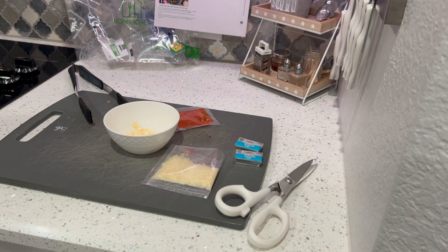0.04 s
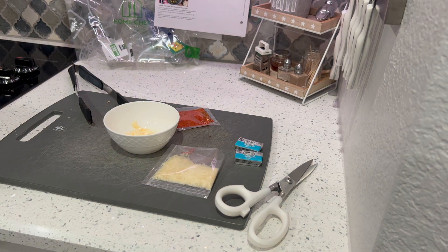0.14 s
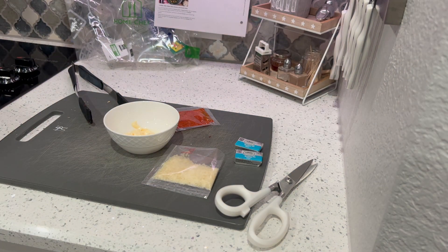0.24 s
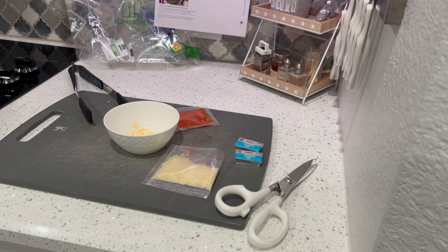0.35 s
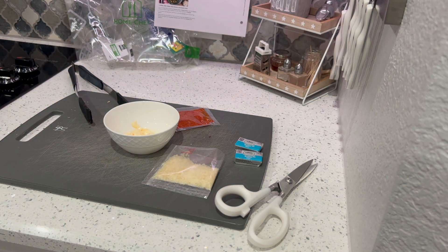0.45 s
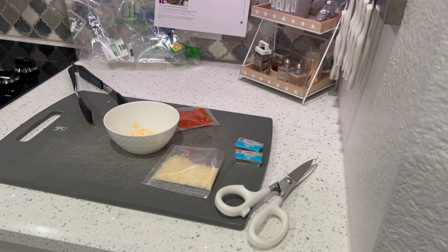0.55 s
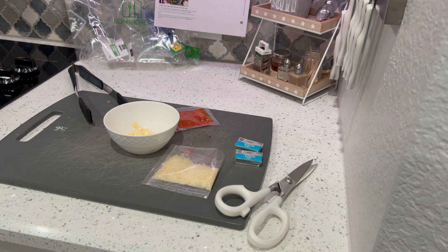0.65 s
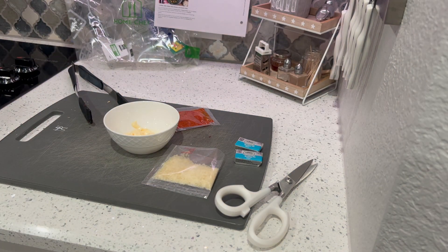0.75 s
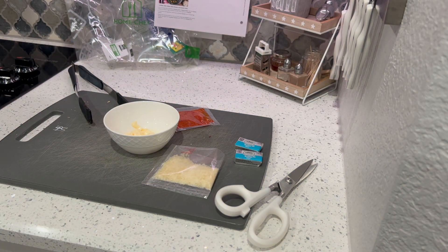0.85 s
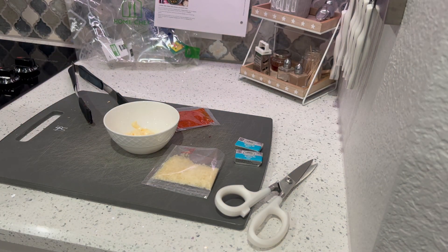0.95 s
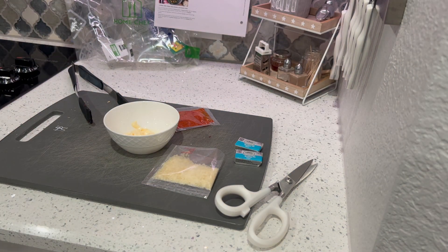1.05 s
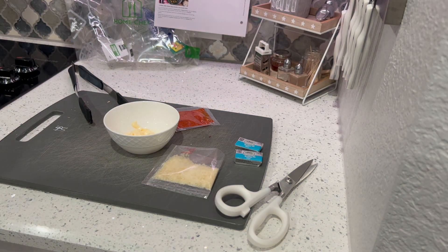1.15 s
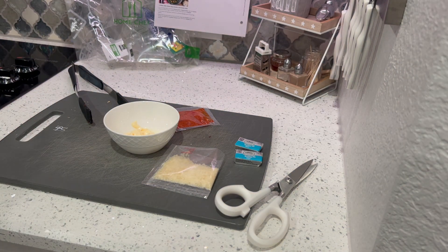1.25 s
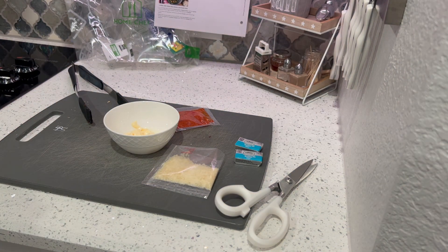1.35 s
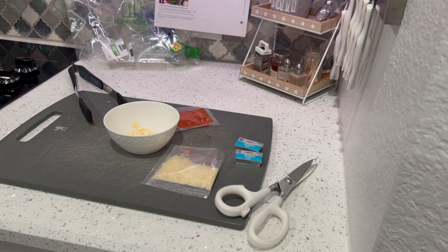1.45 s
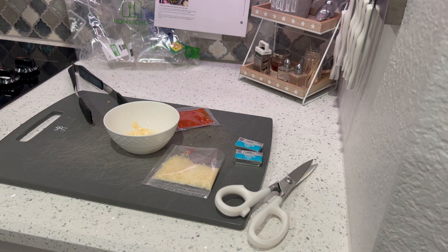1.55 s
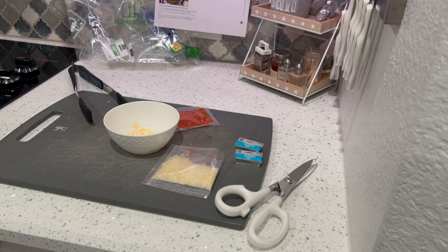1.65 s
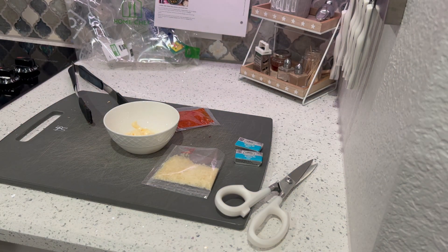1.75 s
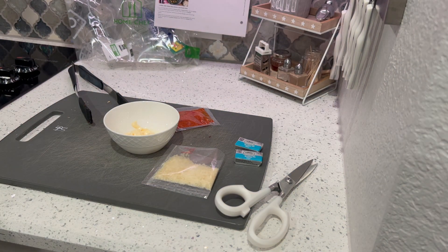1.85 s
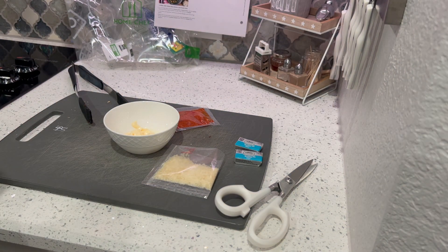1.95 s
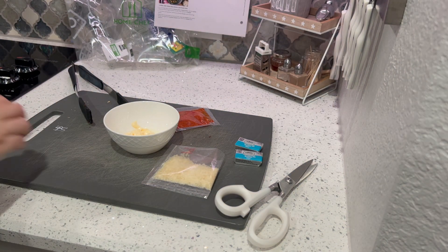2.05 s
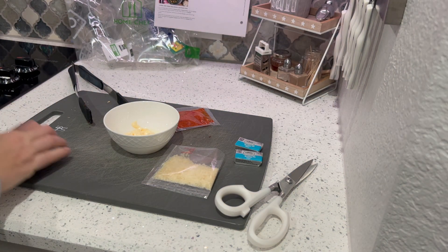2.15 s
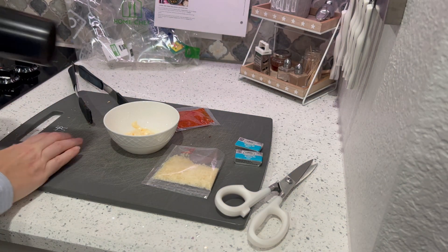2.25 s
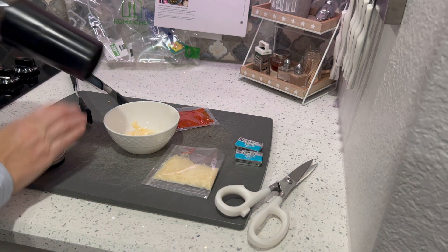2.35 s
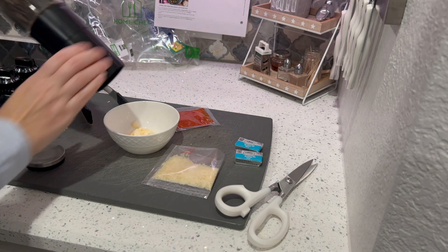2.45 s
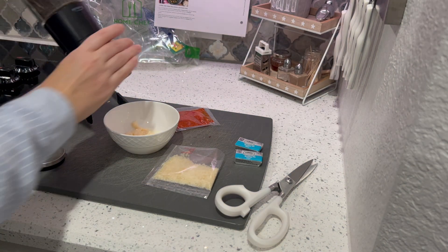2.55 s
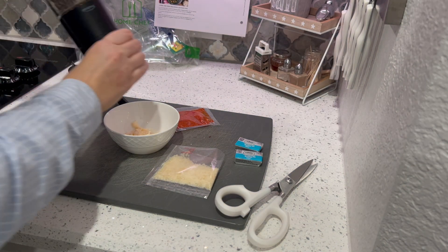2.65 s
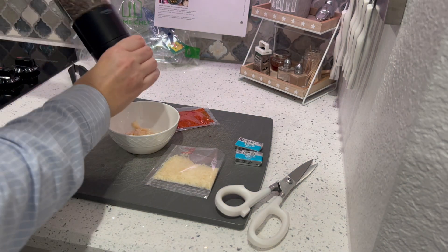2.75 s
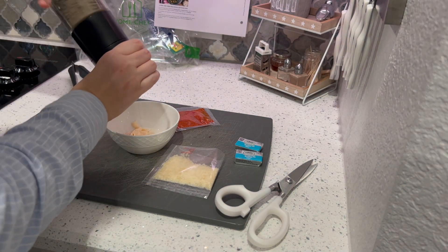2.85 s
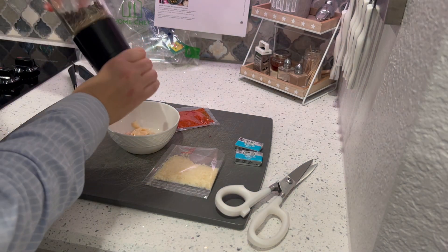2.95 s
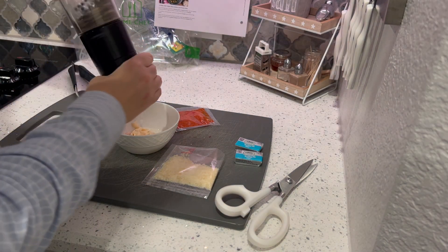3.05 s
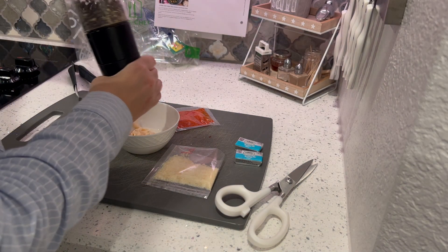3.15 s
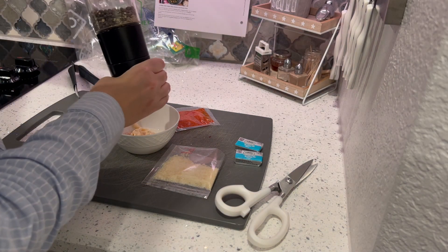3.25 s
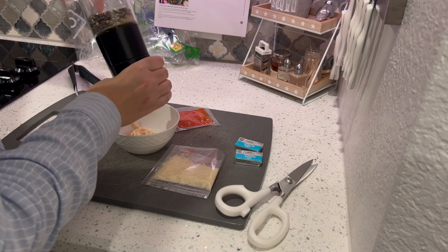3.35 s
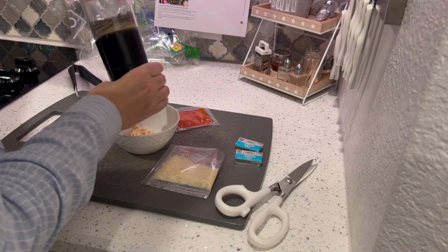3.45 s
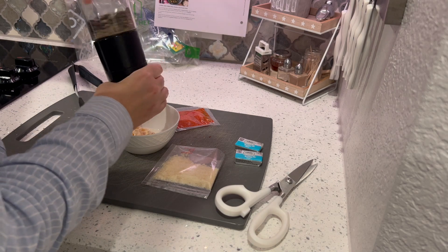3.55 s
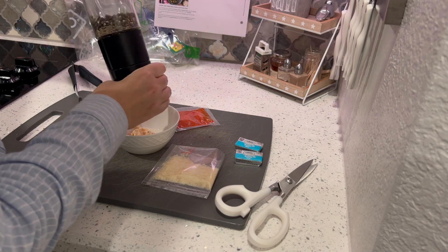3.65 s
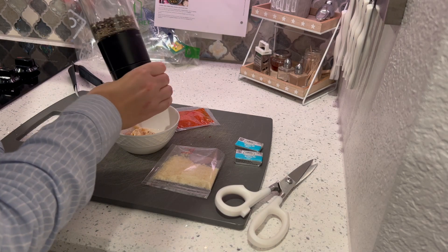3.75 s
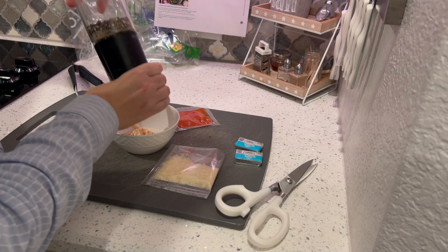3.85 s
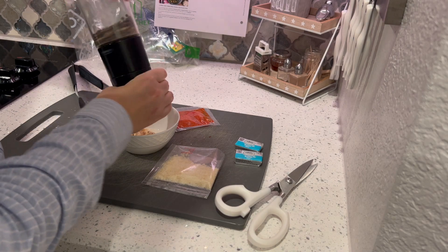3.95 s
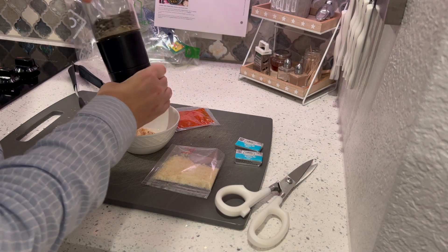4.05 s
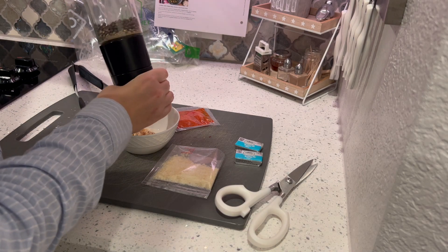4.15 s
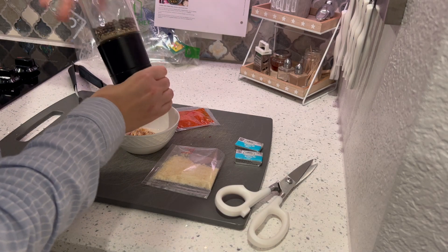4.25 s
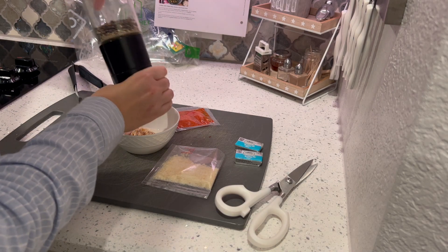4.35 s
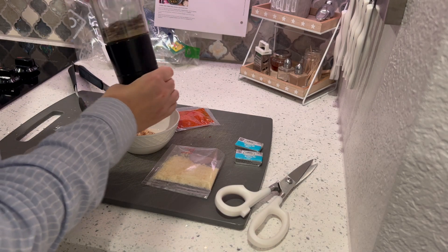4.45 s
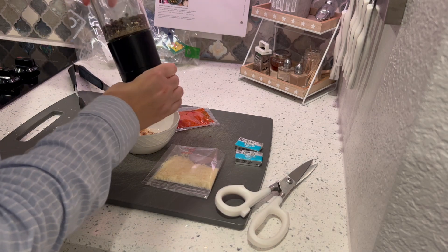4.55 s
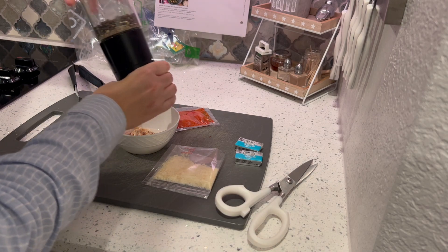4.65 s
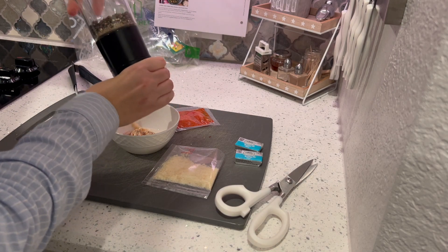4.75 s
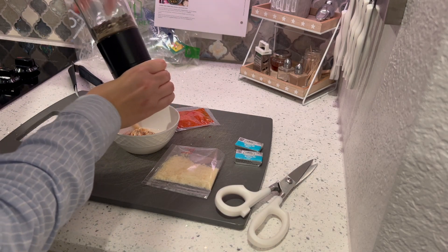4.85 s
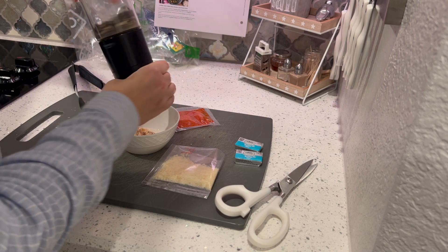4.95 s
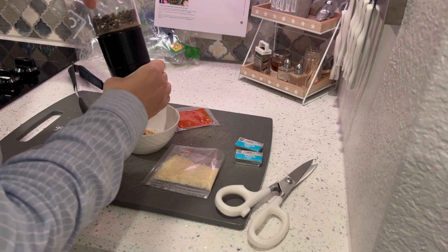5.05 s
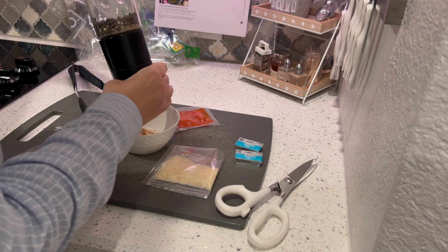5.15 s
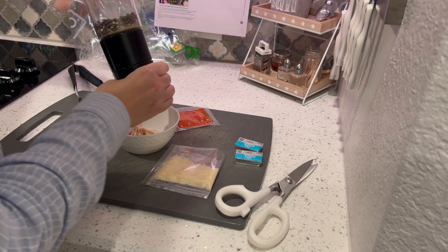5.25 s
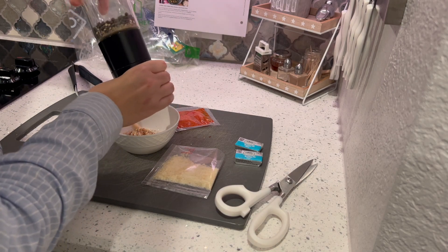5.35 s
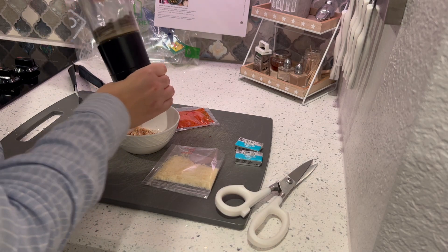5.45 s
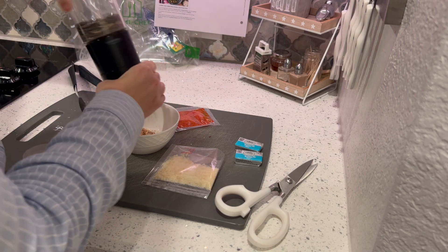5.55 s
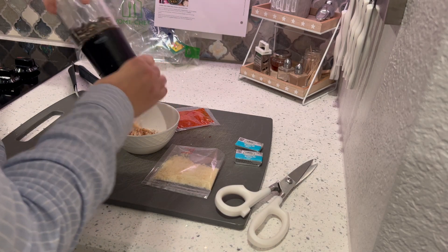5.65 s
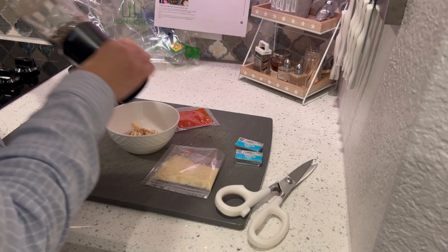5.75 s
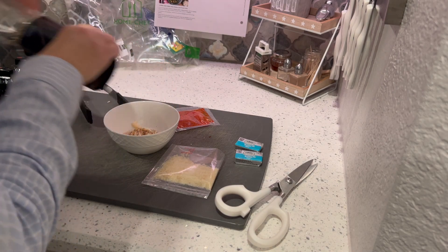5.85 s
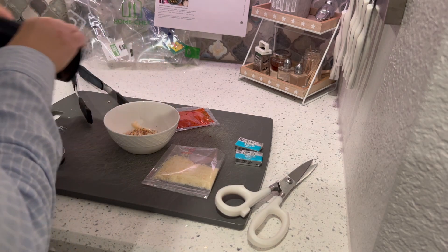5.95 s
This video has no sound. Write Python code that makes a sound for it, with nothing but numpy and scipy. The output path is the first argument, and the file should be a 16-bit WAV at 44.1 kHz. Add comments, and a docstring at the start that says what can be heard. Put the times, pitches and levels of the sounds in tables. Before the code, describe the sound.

A pepper mill is uncapped and tipped with sliding corns, then ground in seven brief crunchy strokes, ending with a glassy spill of corns.

```python
"""Hand-twisted pepper mill in a small kitchen

Hands rustle and shuffle, the cap comes off and is set down, corns slide along the glass as the mill is tipped,
seven short twists crush pepper, and a last heap of corns drops. Filtered random clicks make grinding, ticks and
friction; dying noise bursts make cracks, cap touches and the drop. Noise tails give the hard-walled room.
Heard close by in stereo, a little from the left, over a low household rumble and hiss.
"""
import sys
import numpy as np
from scipy import signal
from scipy.fft import rfft, irfft, next_fast_len
from scipy.io import wavfile

SR = 44100
rng = np.random.default_rng(int(sys.argv[2]) if len(sys.argv) > 2 else 0)


def master(y):
    """Save y as 16-bit WAV."""
    cut = np.clip(np.atleast_2d(y).T, -1, 1)
    pcm = np.round(cut * 32767)  # scale
    wavfile.write(sys.argv[1], SR, pcm.astype(np.int16))


N = 264138
PADDED = next_fast_len(N + SR)
HZ = np.maximum(np.fft.rfftfreq(PADDED, 1 / SR), 1)

# rumble and hiss spectrum: f/Hz, relative level/dB
FLOOR_COLOUR = [(25, -27), (45, -3), (120, -5), (260, -7), (400, -17.5), (800, -21.5), (2500, -25.5),
                (6000, -26.5), (10000, -24), (14000, -25), (16000, -22)]
# bright rustle of hands and sliding corns: full from t/s, hold/s, level/dB, rise/(dB/s)
RUSTLE_MOVES = [(.44, 0.009, -34, 1500), (1.57, .1, -44, 196), (2.455, 0.11, -32, 214.5),
                (2.63, 0.088, -46.5, 196)]
# dull shuffle of hands and sleeves on the counter: full from t/s, hold/s, level/dB
SHUFFLE_MOVES = [(.5, 0.0044, -44.5), (0.556, 0.016, -43.5), (1.05, .01, -45), (1.669, 0.0042, -47)]
# friction spectra: f/Hz, relative level/dB
RUSTLE_COLOUR = [(1500, -28.5), (3000, -27), (6000, -26), (8500, -19), (11000, -24), (13500, -21),
                 (16000, -20.5)]
SHUFFLE_COLOUR = [(120, -41), (300, 3), (700, 0.5), (1400, -10.5), (2200, -17), (5000, -36)]
# corns cracking and small knocks: t/s, body peak level/dB, body f/Hz, treble peak re body/dB
CRACK_EVENTS = [(0.545, -35, 405, -22), (0.953, -46.5, 2930, 9.5), (1.046, -27, 500, -4),
                (1.262, -33, 380, -22), (1.959, -33, 444, -28), (2.407, -19.5, 905, -27),
                (2.451, -19, 337, -10), (2.527, -13, 790, -39), (2.887, -22, 1090, -33),
                (2.991, -9, 1060, -4), (3.027, -11.5, 910, -25), (3.089, -26.5, 367, -18),
                (3.391, -34, 1390, -28), (3.419, -27, 2220, 0), (3.484, -9.5, 1990, -2),
                (3.513, -34, 1290, -23), (3.798, -40.5, 437, -14), (3.93, -6, 1400, 1.5),
                (3.95, -20, 835, 8.5), (4.018, -17, 870, -27), (4.293, -40.5, 323, -5),
                (4.386, -29.5, 2000, 2), (4.403, -24.5, 2100, -6), (4.794, -26.5, 940, -11),
                (4.95, -18, 770, -24), (4.966, -7.5, 915, -34), (5.362, -24, 1400, -9),
                (5.604, -28, 730, -24), (5.884, -44, 3000, 5)]
# loose corns ticking as the mill is tipped: full from t/s, hold/s, level before TICK_GAIN_DB/dB
RATTLE_MOVES = [(1.58, 0.095, -51.5), (2.45, .2, -41.5), (2.85, 0.33, -48.5), (5.55, 0.085, -59.5),
                (5.795, 0.18, -52.5)]
# heap of corns dropping on the glass: t/s, noise level before the glass/dB, t60/s
HEAP_DROP = (5.906, -13.5, 0.099)
# glass resonances: f/Hz, width/Hz, gain/dB
GLASS_MODES = [(3070, 150, -1), (6050, 230, 0), (8100, 250, -5), (10150, 200, 3), (12100, 250, -6),
               (13200, 300, -6), (15400, 250, 0)]
# cap pulled off, cap set down rocking on its rim: t/s, level before CAP_GAIN_DB and the modes/dB
CAP_OFF_TOUCHES = [(1.743, -13.5), (1.749, -18), (1.755, -15.5), (1.762, -21.5)]
CAP_DOWN_TOUCHES = [(2.176, -6), (2.181, -10), (2.188, -0.5), (2.193, 0.5), (2.206, -11)]
# cap resonances in either case: f/Hz, width/Hz, gain/dB
CAP_OFF_BODY = [(630, 100, 0.5), (966, 200, 4), (1280, 110, 0.5), (1600, 350, 1.5), (2590, 450, -7),
                (4720, 450, -11.5), (7600, 2900, -19.5)]
CAP_DOWN_BODY = [(126, 88, -13.5), (865, 370, -5), (1770, 200, -3), (2200, 210, -1), (2480, 150, 1.5),
                 (2650, 81, 1.5), (3540, 240, -6.5), (4730, 400, -16), (7460, 2300, -49.5)]
# twists of the mill: full force from t/s, hold/s, crushing level/dB, fine grit re crushing/dB
TWIST_MOVES = [(2.761, 0.087, -39, -0.5), (2.996, 0.033, -26.5, 2), (3.442, 0.082, -28.5, 1),
               (3.916, 0.044, -25.5, 1), (4.407, .065, -39, 3.5), (4.867, 0.098, -29, 0.5),
               (5.426, 0.091, -28, -1)]
# mill body resonances: f/Hz, width/Hz, gain/dB
MILL_MODES = [(320, 330, 2.5), (767, 18, 8.5), (1180, 69, 8.5), (1834, 45, -1), (2170, 130, 4.5),
              (2590, 65, -0.5)]
# grinding spectra, coarse and fine: f/Hz, relative level/dB
BURR_COLOUR = [(120, -13), (350, -6), (800, -1), (2700, -2.5), (3300, -36.5), (6000, -35)]
GRIT_COLOUR = [(2500, -7.5), (4400, 1), (5300, -3.5), (6200, -2), (8300, -2.5), (10500, -8.5), (13600, -7),
               (16000, 6.5)]
# room decay by octave: f/Hz, t60/s
ROOM_T60 = [(125, 1), (250, 0.6), (500, 0.49), (1000, 0.71), (2000, 0.6), (4000, 0.64), (8000, 0.47),
            (16000, 0.24)]
# stereo width, level of the difference over the sum, before the lean: f/Hz, level/dB
STEREO_WIDTH = [(40, -36.5), (300, -10.5), (700, -1.5), (6000, -4.5), (7200, -4), (8000, -12), (9000, 4.5),
                (9400, 40), (10900, 17), (11500, -0.5), (12200, 6.5), (13800, -38.5), (14800, 3.5)]
# share of the sum that leans to the left channel: f/Hz, share/1
LEFT_LEAN = [(40, .1), (300, .15), (700, 0.19), (5000, 0.48), (8000, 0.02), (16000, 0.01)]

FLOOR_DB = -48.5
RUSTLE_FALL_DB_PER_S = 296
SHUFFLE_RISE_DB_PER_S, SHUFFLE_FALL_DB_PER_S = 499.5, 179
CRACK_T60_S = 0.051
RATTLE_RISE_DB_PER_S, RATTLE_FALL_DB_PER_S = 125, 176
SETTLE_DB, SETTLE_FALL_DB_PER_S = -18.5, 150  # corns shaken by a twist: re crushing, coming to rest
TICK_GAIN_DB, CAP_GAIN_DB = 14.0, 13.5
TWIST_RISE_DB_PER_S, TWIST_FALL_DB_PER_S = 373, 403
GRIT_RISE_DB_PER_S, GRIT_FALL_DB_PER_S = 412, 453  # steeper: the fine grit needs full force
KITCHEN_DB, FIRST_ECHO_S = -11.5, 0.0009
CUTOFF_HZ = 16250


def from_db(db):
    """Amplitude ratio of a level in dB."""
    return 10 ** (np.asarray(db) / 20)


def rms_one(x):
    """Scale to rms 1."""
    return x / np.sqrt(np.mean(x ** 2) + 1e-20)


def at_hz(points):
    """Interpolate a two-column table over log frequency, onto the HZ grid."""
    hz, value = np.transpose(points)
    return np.interp(np.log(HZ), np.log(hz), value)


def colour(x, gain):
    """A causal (minimum-phase) filter of the given gain on the HZ grid."""
    cepstrum = irfft(np.log(gain + 1e-6), PADDED)
    # fold onto positive time: minimum phase
    cepstrum[1:PADDED // 2] *= 2
    cepstrum[PADDED // 2 + 1:] = 0
    response = np.exp(rfft(cepstrum))
    return irfft(rfft(x, PADDED) * response, PADDED)[..., :N]


def resonances(modes):
    """Gain of a set of resonances, summed as power."""
    power = 0
    for hz, width_hz, gain_db in modes:
        detuning = (HZ - hz ** 2 / HZ) / width_hz
        power = power + from_db(2 * gain_db) / (1 + detuning ** 2)
    return np.sqrt(power)


def grains(per_s, spread_db):
    """Random clicks of uneven size and sign; rms 1."""
    sizes = from_db(spread_db * np.minimum(rng.exponential(1, N), 4))
    signs = rng.choice([-1, 1], N)
    hits = rng.random(N) < per_s / SR
    return rms_one(sizes * signs * hits)


def crunch(per_s, spread_db, t60_s):
    """Each breaking bit is a short splinter of noise with a sudden start; rms 1."""
    decay = from_db(-60 / (t60_s * SR))
    envelope = signal.lfilter([1], [1, -decay], abs(grains(per_s, spread_db)))
    return rms_one(envelope * rng.standard_normal(N))


def swells(t_s, hold_s, level_db, rise_db_per_s, fall_db_per_s):
    """Gain of movements that build up to their moment of full force, hold it and die away."""
    t = np.arange(N)[:, None] / SR - t_s
    rise_db = rise_db_per_s * np.minimum(t, 0)
    fall_db = fall_db_per_s * np.maximum(t - hold_s, 0)
    return from_db(level_db + rise_db - fall_db).sum(axis=1)


def dying_noise(t60_s):
    """White noise decaying by 60 dB in t60_s, cut at 0.2 s."""
    size = SR // 5
    return rng.standard_normal(size) * from_db(-60 * np.arange(size) / SR / t60_s)


def add_burst(out, t_s, burst):
    """Mix a burst into out at t_s, in place."""
    at = round(t_s * SR)
    out[at:at + len(burst)] += burst[:N - at]


def rumble_and_hiss():
    """Steady coloured noise, independent in sum and difference."""
    noise = rng.standard_normal((2, N))
    return from_db(FLOOR_DB) * rms_one(colour(noise, from_db(at_hz(FLOOR_COLOUR))))


def handling():
    """Skin and cloth: a bright and a dull friction noise."""
    bright = rms_one(colour(grains(per_s=2100, spread_db=3.0), from_db(at_hz(RUSTLE_COLOUR))))
    scrapes = crunch(per_s=430, spread_db=-1.5, t60_s=0.089)
    dull = rms_one(colour(scrapes, from_db(at_hz(SHUFFLE_COLOUR))))
    rustle = bright * swells(*np.transpose(RUSTLE_MOVES), RUSTLE_FALL_DB_PER_S)
    shuffle = dull * swells(*np.transpose(SHUFFLE_MOVES), SHUFFLE_RISE_DB_PER_S, SHUFFLE_FALL_DB_PER_S)
    return rustle + shuffle


def cracks():
    """Each crack is a splinter of noise that dies fast, through a broad body resonance plus a treble snap."""
    out = np.zeros(N)
    snap = signal.butter(2, [3000, 11000], "band", fs=SR, output="sos")
    for t_s, peak_db, hz, treble_db in CRACK_EVENTS:
        noise = dying_noise(CRACK_T60_S)
        band = signal.butter(2, [hz / 2.04, hz * 1.605], "band", fs=SR, output="sos")
        body = signal.sosfilt(band, noise)
        top = signal.sosfilt(snap, noise)
        crack = body / abs(body).max() + from_db(treble_db) * top / abs(top).max()
        add_burst(out, t_s, from_db(peak_db) * crack)
    return out


def corns_on_glass():
    """Loose corns tick against the jar, also when a twist shakes it; it answers with its own few tones."""
    t_s, hold_s, crush_db, _ = np.transpose(TWIST_MOVES)
    tipped = swells(*np.transpose(RATTLE_MOVES), RATTLE_RISE_DB_PER_S, RATTLE_FALL_DB_PER_S)
    shaken = swells(t_s, hold_s, crush_db + SETTLE_DB, TWIST_RISE_DB_PER_S, SETTLE_FALL_DB_PER_S)
    ticks = grains(per_s=1000, spread_db=0.5) * (tipped + shaken) * from_db(TICK_GAIN_DB)
    drop_s, drop_db, drop_t60_s = HEAP_DROP
    heap = np.zeros(N)
    add_burst(heap, drop_s, from_db(drop_db) * dying_noise(drop_t60_s))
    tones = resonances(GLASS_MODES)
    # broadband noise beside the tones
    heap_gain = tones + from_db(-18.0) * (HZ > 500) + from_db(-9.5) * (HZ > 7500)
    return colour(ticks, tones + from_db(-41)) + colour(heap, heap_gain)


def cap(touch_table, modes, contact_t60_s):
    """Every touch is a short rough contact that the hollow plastic colours."""
    touches = np.zeros(N)
    for t_s, level_db in touch_table:
        add_burst(touches, t_s, from_db(level_db + CAP_GAIN_DB) * dying_noise(contact_t60_s))
    return colour(touches, resonances(modes))


def grinding():
    """Burrs crush the corns: coarse splinters ring the mill's body, finer ones give the grit on top."""
    t_s, hold_s, crush_db, grit_db = np.transpose(TWIST_MOVES)
    coarse = crunch(per_s=1000, spread_db=3.0, t60_s=0.018)
    fine = crunch(per_s=1000, spread_db=3.2, t60_s=0.012)
    body = rms_one(colour(coarse, (resonances(MILL_MODES) + 0.71) * from_db(at_hz(BURR_COLOUR))))
    grit = rms_one(colour(fine, from_db(at_hz(GRIT_COLOUR))))
    body_gain = swells(t_s, hold_s, crush_db, TWIST_RISE_DB_PER_S, TWIST_FALL_DB_PER_S)
    grit_gain = swells(t_s, hold_s, crush_db + grit_db, GRIT_RISE_DB_PER_S, GRIT_FALL_DB_PER_S)
    return body * body_gain + grit * grit_gain


def scattered(x):
    """The same sound over other paths: a few milliseconds of echoes off counter and wall."""
    echoes = rms_one(dying_noise(0.04)) / np.sqrt(SR // 5)  # unit energy
    return signal.fftconvolve(x, echoes)[:N]


def kitchen(x):
    """Two unrelated dense tails: noise that dies octave by octave, starting with the first wall echo."""
    t = np.arange(SR * 4 // 5) / SR
    tails = np.zeros((2, len(t)))
    for hz, t60_s in ROOM_T60:
        edges_hz = [hz / np.sqrt(2), min(hz * np.sqrt(2), 0.45 * SR)]
        band = signal.butter(2, edges_hz, "band", fs=SR, output="sos")
        noise = signal.sosfilt(band, rng.standard_normal((2, len(t))))
        tails += noise * from_db(-60 * t / t60_s)
    tails = tails * (t > FIRST_ECHO_S) / np.sqrt(np.sum(tails ** 2, axis=1, keepdims=True))
    return from_db(KITCHEN_DB) * signal.fftconvolve(x[None], tails, axes=1)[:, :N]


def scene():
    """Sum and difference of the two channels, weighted by frequency, turned into left and right."""
    near = handling() + cracks() + corns_on_glass() + grinding()
    near += cap(CAP_OFF_TOUCHES, CAP_OFF_BODY, contact_t60_s=0.027)
    near += cap(CAP_DOWN_TOUCHES, CAP_DOWN_BODY, contact_t60_s=0.018)
    both, apart = np.array([near, scattered(near)]) + kitchen(near) + rumble_and_hiss()
    width = from_db(at_hz(STEREO_WIDTH))
    both = colour(both, 1 / np.hypot(1, width))
    apart = colour(apart, width / np.hypot(1, width))
    apart = apart + irfft(rfft(both, PADDED) * at_hz(LEFT_LEAN), PADDED)[:N]
    return np.array([both + apart, both - apart])


def record(dry):
    """Clip at full scale, then cut the top with a steep low-pass."""
    top_cut = signal.cheby2(20, 70, CUTOFF_HZ, fs=SR, output="sos")
    return signal.sosfilt(top_cut, np.clip(dry, -1, 1))


dry = scene()
out = record(dry)
master(out)
```